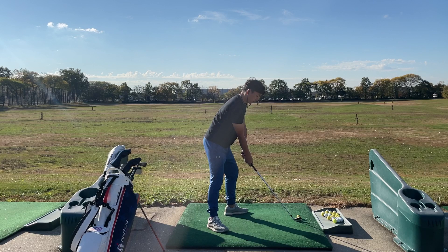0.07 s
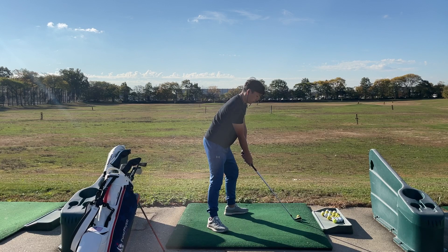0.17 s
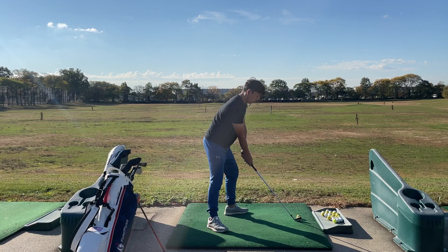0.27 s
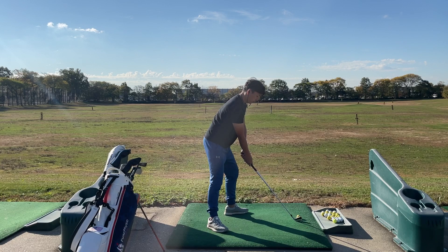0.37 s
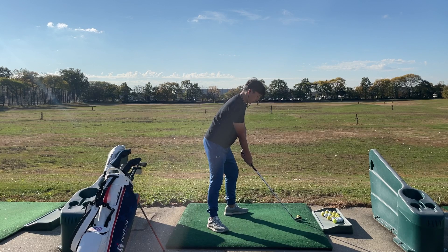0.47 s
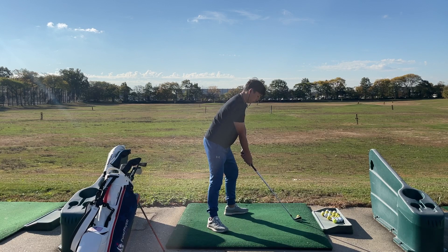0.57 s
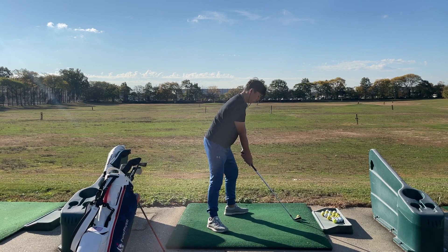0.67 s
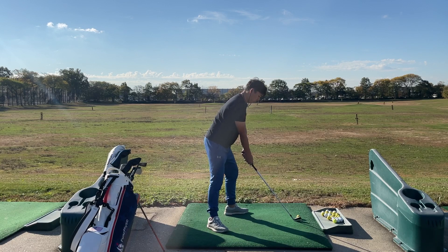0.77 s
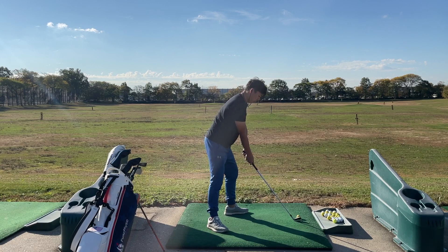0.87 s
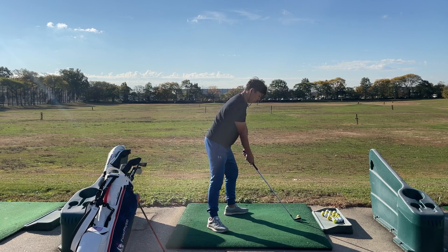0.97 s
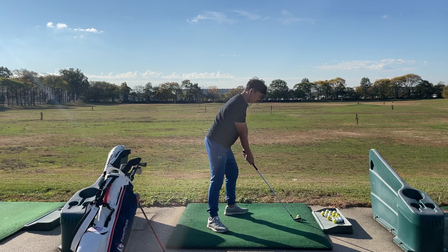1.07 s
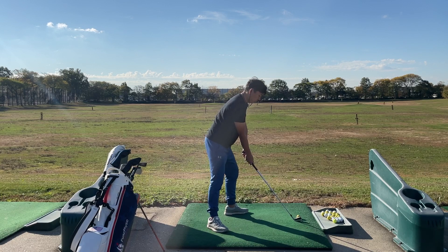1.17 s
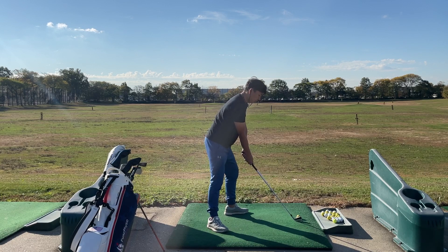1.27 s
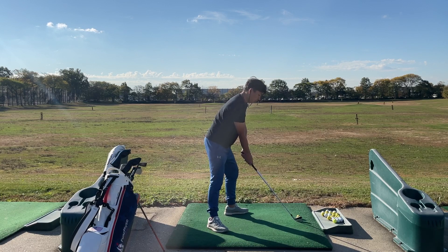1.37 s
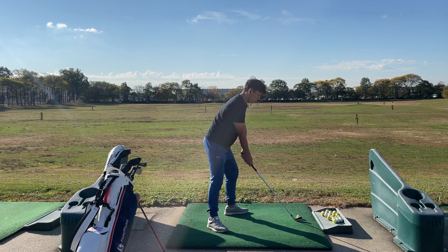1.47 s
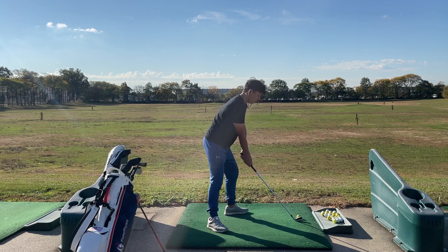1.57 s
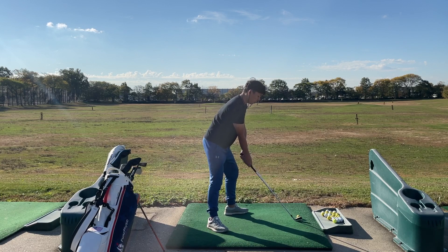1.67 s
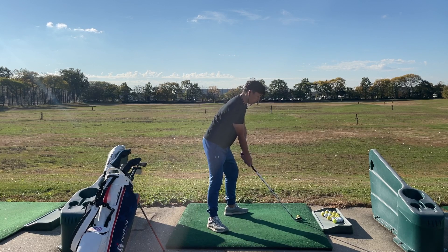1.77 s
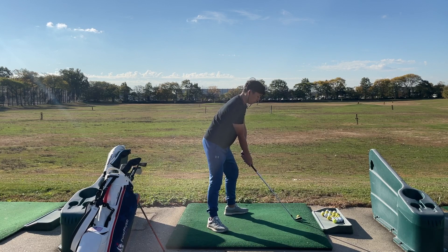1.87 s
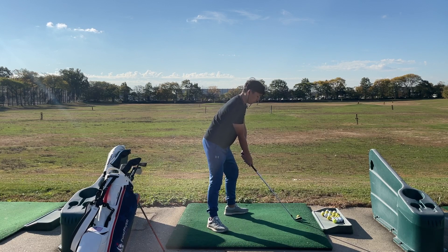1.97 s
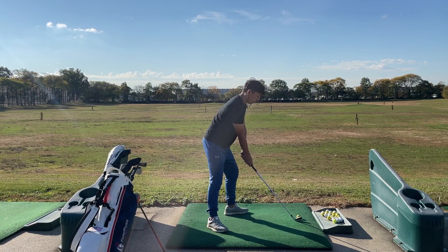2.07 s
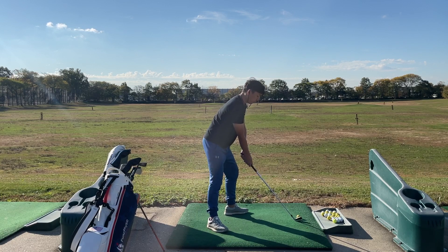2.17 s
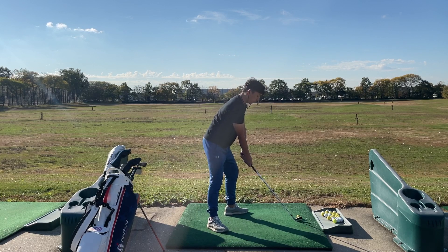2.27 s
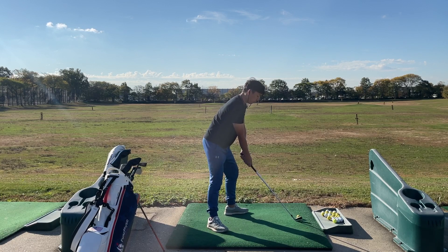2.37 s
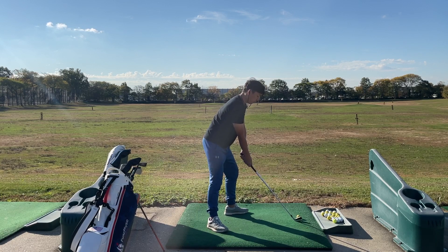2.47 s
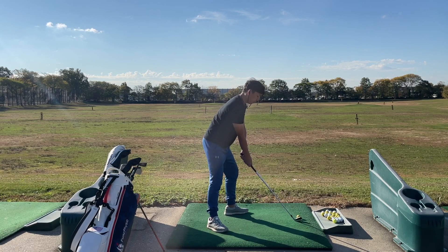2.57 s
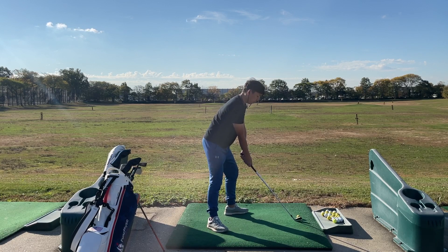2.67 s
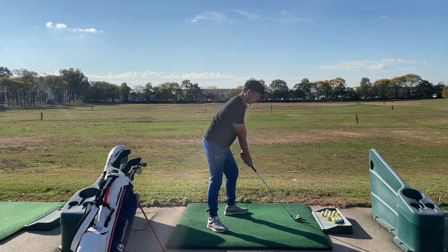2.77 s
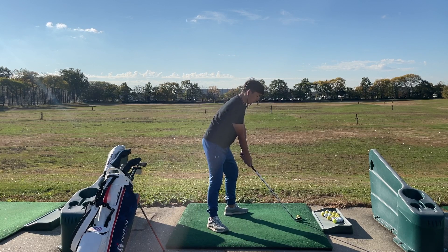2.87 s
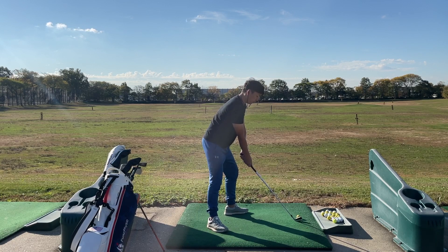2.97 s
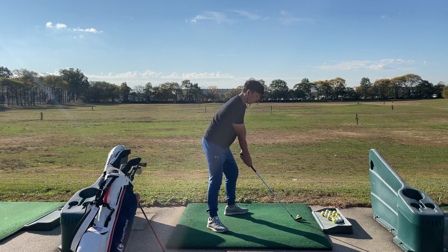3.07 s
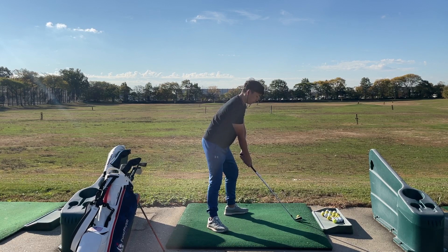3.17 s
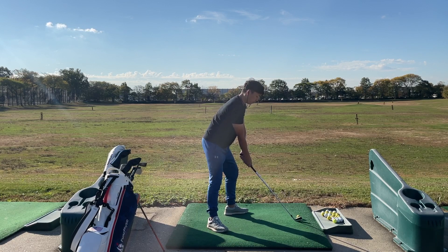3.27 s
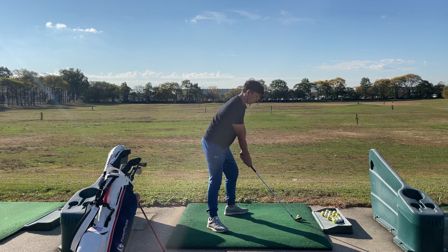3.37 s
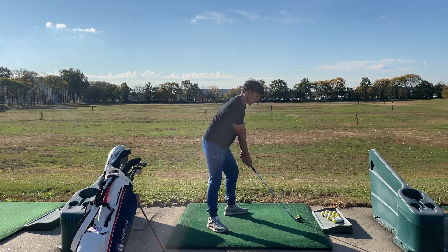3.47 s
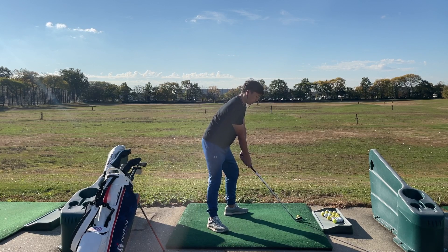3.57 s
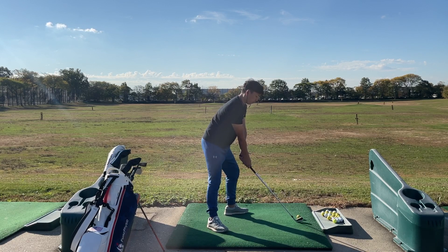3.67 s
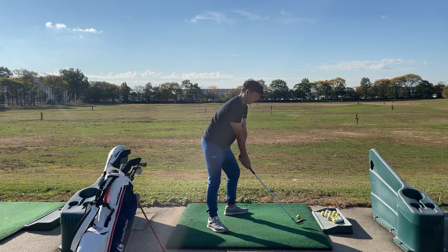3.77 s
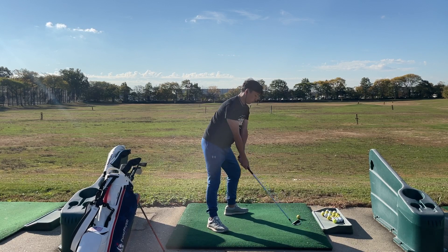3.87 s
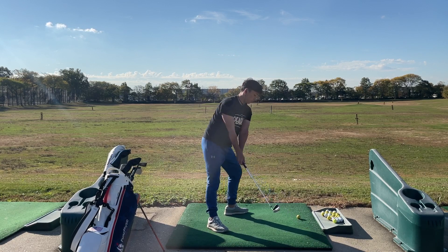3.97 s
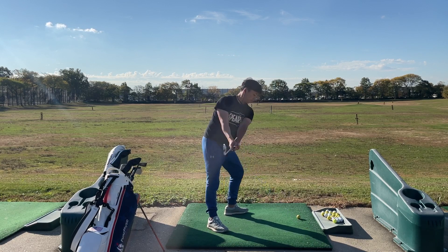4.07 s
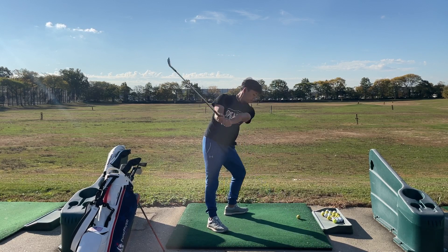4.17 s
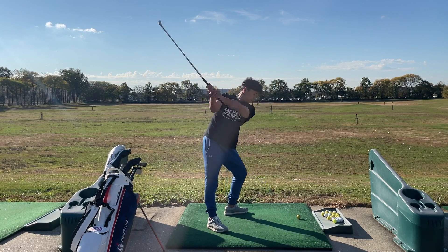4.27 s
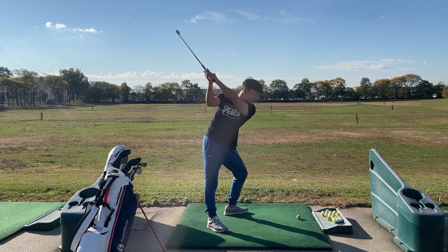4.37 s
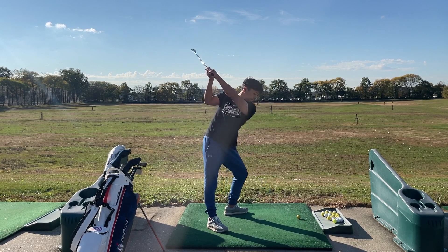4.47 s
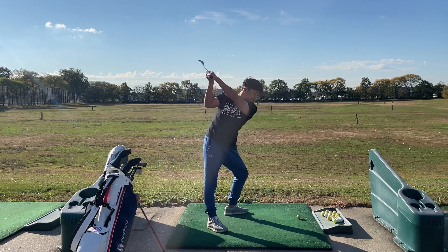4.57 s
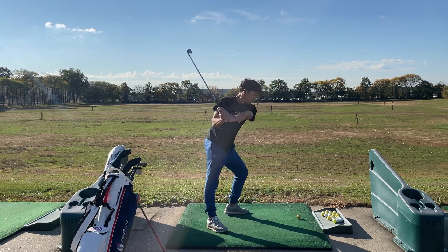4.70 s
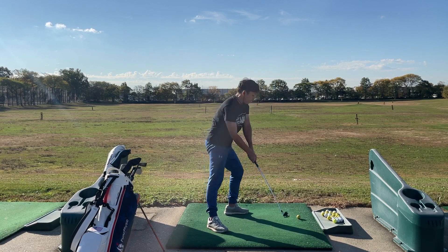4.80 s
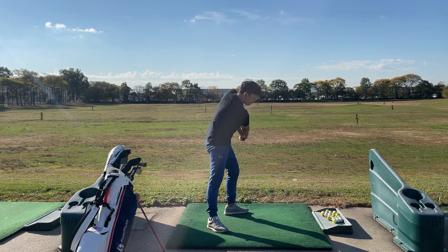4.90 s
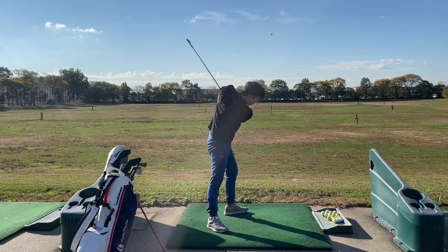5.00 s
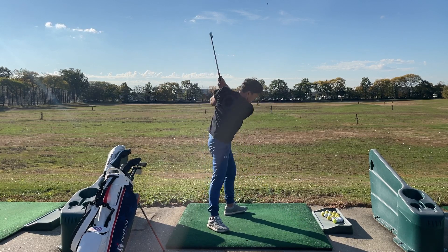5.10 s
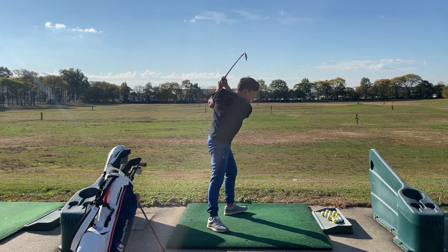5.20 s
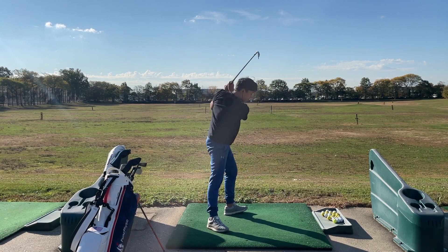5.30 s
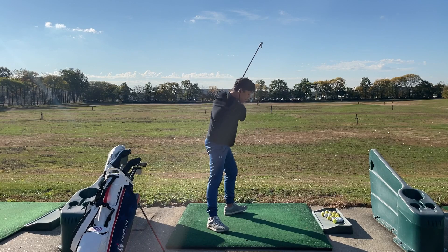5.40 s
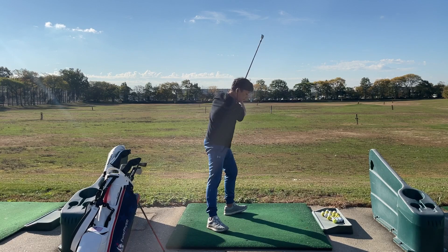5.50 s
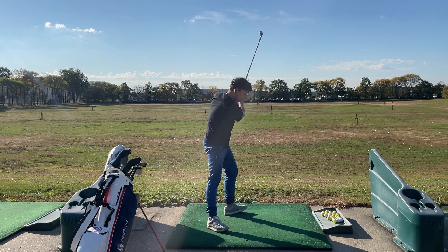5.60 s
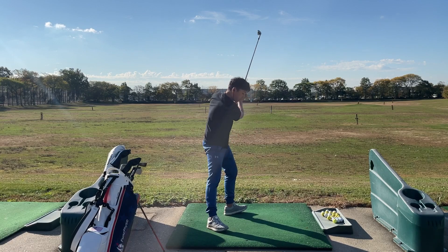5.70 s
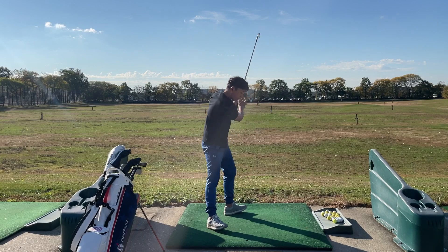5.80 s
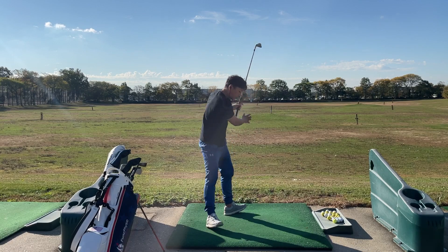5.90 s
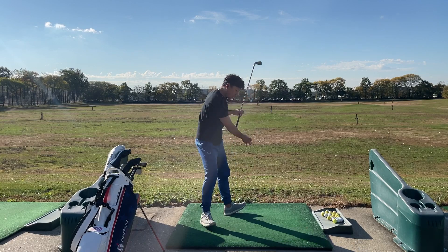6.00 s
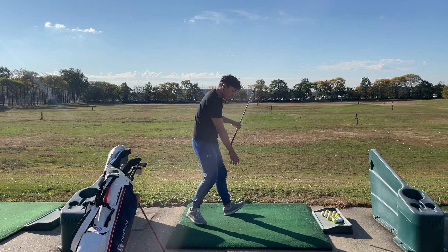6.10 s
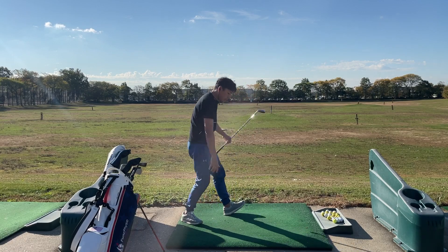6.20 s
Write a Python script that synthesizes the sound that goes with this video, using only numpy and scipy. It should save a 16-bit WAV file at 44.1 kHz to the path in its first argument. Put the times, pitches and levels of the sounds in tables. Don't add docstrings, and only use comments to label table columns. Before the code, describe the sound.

Low distant road rumble and faint bird whistles, then a quick swoosh and one sharp, bright golf strike with a short mat thump.

```python
import sys
import numpy as np
from scipy import signal
from scipy.fft import rfft, irfft, next_fast_len
from scipy.io import wavfile
from scipy.ndimage import map_coordinates

SR = 44100
rng = np.random.default_rng(int(sys.argv[2]) if len(sys.argv) > 2 else 0)


def gain_from_decibels(decibels):
    exponent = np.asarray(decibels, float) / 20
    return 10 ** exponent


def unload_audio(sound):
    columns = np.transpose(np.atleast_2d(sound))
    steps = np.round(np.clip(columns, -1, 1) * 32767)
    wavfile.write(sys.argv[1], SR, steps.astype(np.int16))


N = 275404
T = np.arange(N) / SR


def unit(x):
    return x / np.sqrt(np.mean(x ** 2) + 1e-20)


def along(points, hz):
    f, v = np.transpose(points)
    return np.interp(np.log(hz + 1), np.log(f + 1), v)


def curves(rows):
    s, *cols = np.transpose(rows)
    return [np.interp(T, s, c) for c in cols]


def wobble(rate, count=N):
    coarse = T[:count + 16:16]
    knots = rng.standard_normal(int(count * rate / SR) + 4)
    return np.interp(T[:count], coarse, map_coordinates(knots, [coarse * rate + 1]))


def filtered(x, response):
    edge = 4096
    m = next_fast_len(N + 2 * edge)
    margins = [(0, 0)] * (x.ndim - 1) + [(edge, m - N - edge)]
    long = np.pad(x, margins, "reflect", reflect_type="odd")
    return irfft(rfft(long) * response(np.fft.rfftfreq(m, 1 / SR)), m)[..., edge:N + edge]


def lead(points):
    return lambda hz: np.exp(.5j * along(points, hz) * [[-1], [1]])


def rush(spectrum, alike):
    def mix(hz):
        turn = np.arccos(np.clip(along(alike, hz), -1, 1)) / 2
        return gain_from_decibels(along(spectrum, hz)) * [np.cos(turn), np.sin(turn)]

    white = np.pad(rng.standard_normal((2, N - 2)), [(0, 0), (1, 1)])
    mid, side = filtered(white, mix)
    return unit(np.array([mid + side, mid - side]))


def tone(hz):
    return np.sqrt(2) * np.sin(2 * np.pi * np.cumsum(hz) / SR)


def burst(gain, spectrum, alike, flutter_db):
    return gain * gain_from_decibels(flutter_db * wobble(120)) * rush(spectrum, [(500, alike)])


def note(start, end, hz, db, rough_db, waver_hz):
    out, n = np.zeros(N), round((end - start) * SR)
    swell = np.sin(np.pi * np.arange(n) / n) ** .5
    level = gain_from_decibels(db + rough_db * wobble(195, count=n))
    out[round(start * SR):][:n] = level * swell * tone(hz + waver_hz * wobble(290, count=n))
    return out


def thumps(rows):
    out = np.zeros(N)
    for s, hz, db, t60 in rows:
        t = np.maximum(T - s, 0)
        out += gain_from_decibels(db - 60 * t / t60) * (1 - np.exp(-t / 0.0028)) * np.sin(2 * np.pi * hz * t)
    return out * gain_from_decibels([[.6], [-1.2]])


def swells(rows):
    levels = []
    for s, db, rise_s, hold_s, fall_s in rows:
        away = np.maximum((s - T) / rise_s, (T - s - hold_s) / fall_s)
        levels.append(db - 60 * np.maximum(away, 0))
    return gain_from_decibels(np.max(levels, axis=0))


def passes(rows):
    return np.sqrt(sum(gain_from_decibels(db) ** 2 / (1 + ((T - s) / half_s) ** 2) for s, db, half_s in rows))


# pitch_hz, likeness (0 to 1)
LIKENESS = [(60, 0.95), (300, 0.9), (600, 0.26), (1500, 0.26), (2800, 0.51), (3600, 0.17), (4700, 0.45),
            (5800, 0.11), (7000, 0.69), (8200, 0.95), (10000, .75), (11500, 0.57), (13000, .65),
            (15000, .99)]
# time_s, level_db
ROAD_FLOW = [(0, -38.5), (.8, -38), (1.1, -44), (2.0, -40.5), (2.8, -40), (3.4, -45), (4.1, -35),
             (4.6, -39.5), (5.0, -36), (5.42, -36), (5.75, -40.5), (6.24, -41)]
# time_s, level_db
AXLES = [(.07, -33.5), (.2, -42), (.31, -33), (.42, -40), (.71, -33), (.85, -37), (1.16, -35.5),
         (1.49, -40), (1.75, -41), (1.91, -35.5), (3.05, -33), (3.18, -37), (3.319, -34.5), (3.51, -31),
         (3.6, -32), (3.68, -34.5), (3.77, -36), (3.89, -35), (4.19, -29), (4.33, -33), (4.48, -37),
         (4.68, -26.5), (5.23, -37), (5.35, -36), (5.5, -36.5), (5.63, -34), (6.01, -35)]
# pitch_hz, level_db (per Hz)
RUMBLE_COLOUR = [(12, -60), (25, -24), (45, -4), (62, 0), (100, -7.5), (135, -11.5), (165, -18.5),
                 (230, -30), (400, -120)]


def road_rumble():
    seams = swells([(s, db, 0.3, 0, 0.24) for s, db in AXLES])
    flow = np.hypot(gain_from_decibels(curves(ROAD_FLOW)[0]), seams)
    return flow * gain_from_decibels(2.5 + 0.56 * wobble(5.4)) * rush(RUMBLE_COLOUR, LIKENESS)


# nearest_s, level_db, half_power_s
LORRY_PASSES = [(.65, -54.5, .4), (1.55, -54, .2), (2.2, -53.5, .25), (3.68, -50.5, 0.15),
                (4.45, -42, 0.12), (5.12, -49.5, 0.14), (6.2, -49.5, .15)]
# pitch_hz, level_db (per Hz)
LORRY_COLOUR = [(90, -120), (150, 0), (210, 3.5), (320, 1), (400, -6.5), (600, -22.5), (1000, -20),
                (1500, -120)]
# peak_s (rise ends), level_db, rise_s, hold_s, fall_s
PANEL_RATTLE = [(5.0, -49.5, 0.56, 0.05, 0.32)]
# pitch_hz, level_db (per Hz)
PANEL_COLOUR = [(300, -120), (420, -3.5), (600, 2), (900, -3.5), (1200, -29), (1600, -120)]
# peak_s (rise ends), level_db, rise_s, hold_s, fall_s
CAB_BOOM = [(4.3, -39, 0.68, 0.2, .5), (4.98, -49, 0.6, 0.1, .5), (.6, -52.5, .6, .2, 0.65)]
# pitch_hz, level_db (per Hz)
CAB_COLOUR = [(120, -120), (180, -39.5), (250, -5.5), (290, -1), (330, 0.5), (370, -10), (470, -39.5),
              (700, -120)]
# peak_s (rise ends), level_db, rise_s, hold_s, fall_s
TRAILER_BOOM = [(4.42, -41.5, .4, 0.16, 0.72), (5.03, -46.5, .4, .2, 0.45), (6.14, -49, .4, .1, .4)]
# pitch_hz, level_db (per Hz)
TRAILER_COLOUR = [(100, -120), (150, -39.5), (200, 0), (235, 2), (265, -4.5), (350, -41), (500, -120)]


def lorries():
    near = passes(LORRY_PASSES)
    far_db, panel_db = -52.5, -8.5
    drone = np.hypot(gain_from_decibels(far_db), near) * gain_from_decibels(1.5 + 0.37 * wobble(5.9)) * rush(LORRY_COLOUR, LIKENESS)
    panel_gain = gain_from_decibels(panel_db) * near + swells(PANEL_RATTLE)
    panels = burst(panel_gain, PANEL_COLOUR, alike=.7, flutter_db=1.8)
    cab = burst(swells(CAB_BOOM), CAB_COLOUR, alike=1.0, flutter_db=2.0)
    trailer = burst(swells(TRAILER_BOOM), TRAILER_COLOUR, alike=1.0, flutter_db=-0.5)
    return drone + panels + cab + trailer


# nearest_s, level_db, half_power_s
CAR_PASSES = [(1.7, -59, 0.45), (4.72, -55, 0.13), (5.82, -52.5, 0.12), (6.24, -56.5, 0.23)]
# pitch_hz, level_db (per Hz)
TYRE_COLOUR = [(200, -120), (380, 1), (600, 2), (1000, -1), (1500, -8.5), (2600, -16.5), (3600, -23.5),
               (6000, -32), (9000, -120)]


def tyres():
    steady = gain_from_decibels(-53 + 0.2261 * T)
    gain = np.hypot(steady, passes(CAR_PASSES))
    return gain * gain_from_decibels(2.5 + 0.37 * wobble(5)) * rush(TYRE_COLOUR, LIKENESS)


# time_s, high_pitch_hz, high_level_db, low_pitch_hz, low_level_db
ENGINE_TONES = [(0, 324.1, -54, 136, -48.5), (1, 325.3, -53, 135.1, -54), (2.4, 321, -61, 134.1, -51.5),
                (3, 325, -72, 134.9, -54.5), (3.8, 318, -54, 136.6, -56.5), (4.6, 317, -69.5, 134.3, -57.5),
                (6.24, 312.8, -56.5, 136, -57)]
# time_s, pitch_hz, level_db
GEAR_CHANGE = [(5.76, 167.8, -81), (5.82, 141.6, -39.5), (5.9, 85.1, -38.5), (6.0, 60.6, -31),
               (6.12, 51.3, -34.5), (6.2, 44, -74)]


def engines():
    high_hz, high_db, low_hz, low_db = curves(ENGINE_TONES)
    high = gain_from_decibels(high_db + 0.98 * wobble(12)) * tone(high_hz + 4 * wobble(15))
    low = gain_from_decibels(low_db + 5.2 * wobble(9)) * tone(low_hz + 2.17 * wobble(11))
    drop_hz, drop_db = curves(GEAR_CHANGE)
    return high + low + gain_from_decibels(drop_db) * tone(drop_hz) * (T > GEAR_CHANGE[0][0])


# pitch_hz, right_leads_radians (extra)
ROAD_DIRECTION = [(200, 0), (450, .5), (900, 1.7), (1500, 2), (2000, -.2), (3000, 0)]


def traffic():
    return filtered(road_rumble() + lorries() + tyres() + engines(), lead(ROAD_DIRECTION))


# time_s, level_db
INSECT_LEVEL = [(0, -73.5), (.7, -74), (1.8, -68.5), (2.4, -68), (3.0, -68.5), (3.7, -67.5), (4.2, -69.5),
                (4.6, -72.5), (5.0, -71), (5.45, -73.5), (6.24, -75)]
# pitch_hz, level_db (per Hz)
INSECT_COLOUR = [(3000, -120), (4000, -5), (5200, -2), (6800, -5.5), (8000, -10), (9500, -120)]


def insects():
    return gain_from_decibels(curves(INSECT_LEVEL)[0] + .8 * wobble(14)) * rush(INSECT_COLOUR, LIKENESS)


# time_s, level_db
BREEZE_LEVEL = [(0, -73.5), (.7, -75), (1.5, -75.5), (2.3, -74), (2.9, -75), (3.6, -76.5), (4.1, -77),
                (4.4, -80.5), (4.7, -78), (5.5, -79), (6.24, -79.5)]
# peak_s (rise ends), level_db, rise_s, hold_s, fall_s
GUSTS = [
    (4.88, -64, .4, 0.0067, 0.85),
    (6.24, -79, 3, 0.0021, 1),
]
# pitch_hz, level_db (per Hz)
LEAF_COLOUR = [(2000, -120), (3500, -1), (6000, -4.5), (8200, -2.5), (11000, -6.5), (13500, -12.5),
               (15600, -10.5), (16000, -120)]


def leaves():
    breeze = np.hypot(gain_from_decibels(curves(BREEZE_LEVEL)[0]), swells(GUSTS))
    return breeze * gain_from_decibels(.7 * wobble(7.2)) * rush(LEAF_COLOUR, LIKENESS)


# start_s, level_db, pitch_hz (centre), decay_s (over 60 dB)
CLOTH_TICKS = [(.59, -62, 11000, .015), (1.2446, -46, 7000, 0.0078), (1.2472, -50, 12500, 0.0061),
               (1.2525, -58, 11000, .008), (1.367, -49.5, 8800, .012), (1.4442, -65, 12000, 0.0061),
               (1.81, -56, 3500, .01), (2.052, -50, 4226, .01), (2.7383, -49, 6500, 0.0051),
               (2.9675, -55, 5500, .005), (4.518, -54, 7000, 0.0054), (4.5206, -50, 5500, 0.011),
               (4.638, -58, 3500, .07), (4.64, -68, 11000, .05), (4.6545, -55.5, 11500, 0.012),
               (4.668, -54, 12500, .012), (4.9135, -64, 11000, 0.007), (5.35, -51, 5000, 0.0086),
               (6.1352, -54, 3590, 0.06), (6.1868, -62, 12500, .012)]


def ticks():
    out, t = np.zeros(N + SR), np.arange(2048) / SR
    band = np.log(np.fft.rfftfreq(len(t), 1 / SR) + 1)
    for s, db, hz, t60 in CLOTH_TICKS:
        colour = np.exp(-((band - np.log(hz)) / .5) ** 2)
        grit = unit(irfft(rfft(rng.standard_normal(len(t))) * colour))
        out[round(s * SR):][:len(t)] += gain_from_decibels(db - 60 * t / t60) * (1 - np.exp(-t / .0008)) * grit
    return out[:N]


# start_s, break_s, pitch_hz, level_db
HIGH_NOTES = [
    (0.931, 0.992, 3027, -58.5),
    (2.203, 2.28, 2924, -58.5),
    (6.043, 6.107, 2847, -64.5),
]
# end_s, pitch_hz, level_db, overtone_db, echo_s
LOW_NOTES = [
    (1.04, 2300, -60, -7, .03),
    (2.299, 2450, -54, -6, .018),
    (6.124, 2480, -55, -24, 0.062),
]
# start_s, end_s, pitch_hz, level_db
LATE_ECHOES = [
    (1.02, 1.032, 2250, -63),
    (1.036, 1.056, 2230, -65),
]


def bird():
    song = np.zeros(N)
    break_s, fade_s = 0.0095, 0.0065
    pure_db, reedy_db, break_db = -27, -12, -30
    for (start, snap, hz, db), (end, low_hz, low_db, over_db, echo_s) in zip(HIGH_NOTES, LOW_NOTES):
        low = snap + break_s
        sag = lambda s: low_hz - 4900 * (s - low)
        pitch_hz, level_db, reed_db = curves([
            (start, .88 * hz, db - 6, pure_db),
            (start + 0.189 * (snap - start), .985 * hz, db - 2.5, pure_db),
            (snap - .025, 1.01 * hz, db, pure_db + 5),
            (snap, .98 * hz, db, reedy_db),
            (snap + break_s / 2, (hz + low_hz) / 2, low_db - 3.0, break_db),
            (low, low_hz, low_db, over_db - 12),
            (low + fade_s, sag(low + fade_s), low_db, over_db),
            (end - fade_s, sag(end - fade_s), low_db - 2, over_db),
            (end, sag(end), low_db - 25, over_db)])
        overtones = tone(2 * pitch_hz) + 0.65 * tone(3 * pitch_hz) * (T > low)
        thinning = gain_from_decibels(-350 * np.maximum(T - low, 0))
        voice = thinning * tone(pitch_hz) + gain_from_decibels(reed_db) * overtones
        song += gain_from_decibels(level_db + 2.1 * wobble(140)) * voice * (T > start) * (T < end)
        song += note(snap, snap + echo_s, .99 * hz, -63, rough_db=-2.0, waver_hz=13.4)
    song += sum(note(*row, rough_db=2.5, waver_hz=40) for row in LATE_ECHOES)
    song = filtered(song, lambda hz: 1 / (1 + (hz / 7600) ** 12))
    t = np.arange(SR // 8) / SR
    trees = rng.standard_normal((2, len(t))) * gain_from_decibels(-60 * t / .12) * (t > .004)
    wet = signal.fftconvolve(song[None], trees / np.linalg.norm(trees[0]), axes=1)[:, :N]
    return song * gain_from_decibels([[1.2], [-1.2]]) + gain_from_decibels(-11) * wet


# start_s, pitch_hz, level_db, decay_s (over 60 dB)
FAR_THUDS = [(4.635, 360, -24.5, 0.058), (4.632, 250, -27, .07), (4.4815, 600, -30.5, 0.055),
             (4.67, 150, -23, 0.093), (5.025, 125, -26, .1), (5.8, 150, -26, 0.076)]


def far_mats():
    return thumps(FAR_THUDS)


# start_s, end_s, pitch_hz, level_db
GRIP_SQUEALS = [(5.63, 5.645, 5010, -72), (5.665, 5.70, 5010, -71), (5.697, 5.715, 5000, -64),
                (5.658, 5.72, 11800, -73.5), (5.665, 5.70, 10500, -80), (5.70, 5.73, 11450, -83),
                (5.66, 5.72, 7150, -74), (5.75, 5.81, 3680, -64), (5.77, 5.79, 3270, -60),
                (5.77, 5.79, 4300, -68), (5.9, 5.93, 2250, -67), (6.17, 6.24, 2830, -70),
                (5.79, 5.855, 3310, -65), (5.81, 5.825, 6780, -70), (5.72, 5.84, 6790, -75),
                (5.70, 5.79, 4570, -70), (5.75, 5.80, 4150, -69), (5.8, 5.87, 920, -52),
                (4.636, 4.657, 2750, -65), (4.634, 4.66, 4250, -69)]
# time_s, pitch_hz, level_db
SLIDING_SQUEAL = [(5.69, 5050, -90), (5.71, 4850, -73), (5.745, 4450, -71), (5.775, 3800, -69),
                  (5.81, 3400, -69), (5.85, 3250, -90)]
# peak_s (rise ends), level_db, rise_s, hold_s, fall_s
GLOVE_SLIDE = [
    (5.66, -76, .15, .07, .3),
    (5.76, -57.5, .15, 0.056, .25),
    (6.03, -79, .3, 0.0065, .3),
]
# pitch_hz, level_db (per Hz)
AIR_COLOUR = [(250, -61.5), (500, 8), (1000, -4), (2500, -4), (4200, -9), (7000, -20.5), (10500, -23),
              (14000, -28), (15600, -40), (16000, -120)]
# peak_s (rise ends), level_db, rise_s, hold_s, fall_s
LEATHER_TWIST = [
    (5.665, -75, 0.089, .055, .2),
    (5.79, -75, 0.35, .03, .2),
]
# pitch_hz, level_db (per Hz)
LEATHER_COLOUR = [(3000, -120), (5000, -2), (8000, 0), (12000, -2), (14000, -6), (15500, -15),
                  (16000, -120)]


def grip():
    squeals = sum(note(*row, rough_db=3.5, waver_hz=65) for row in GRIP_SQUEALS)
    creak_hz, creak_db = curves(SLIDING_SQUEAL)
    sounding = (T > SLIDING_SQUEAL[0][0]) * (T < SLIDING_SQUEAL[-1][0])
    squeals += gain_from_decibels(creak_db + 5 * wobble(150)) * tone(creak_hz + 180 * wobble(250)) * sounding
    slide = burst(swells(GLOVE_SLIDE), AIR_COLOUR, alike=.9, flutter_db=2.5)
    twist = burst(swells(LEATHER_TWIST), LEATHER_COLOUR, alike=.95, flutter_db=1.0)
    return slide + twist + squeals


# time_s, level_db
SWISH = [(4.68, -100), (4.72, -72), (4.75, -63), (4.778, -45.5), (4.80, -41.5), (4.821, -38),
         (4.828, -43.5), (4.837, -68), (4.845, -100)]
# peak_s (rise ends), level_db, rise_s, hold_s, fall_s
TURF_SPRAY = [(4.841, -27, .007, 0.0011, .055), (4.85, -39, .03, 0.0041, 0.084), (4.865, -48.5, .05, 0, .2),
              (4.96, -59, .4, 0.072, .3)]
# pitch_hz, level_db (per Hz)
FIBRE_COLOUR = [(250, -61), (600, 1.5), (2400, 3.5), (3300, -2.5), (4500, -2), (8000, -19), (11500, -19),
                (14000, -34), (15000, -50.5), (15500, -120)]


def swing():
    air = burst(gain_from_decibels(curves(SWISH)[0]), AIR_COLOUR, alike=0.93, flutter_db=.9)
    return air + burst(swells(TURF_SPRAY), FIBRE_COLOUR, alike=0.81, flutter_db=1.4)


# peak_s, level_db, rise_s, ring_share (of the full ring time)
CONTACTS = [
    (4.8374, -21, .0005, .5),
    (4.83885, -5.5, .00055, .55),
    (4.84052, -5.7, .00045, .55),
    (4.84135, -10, .00035, .85),
    (4.8426, -17.5, .0003, .5),
]
# pitch_hz, level_db, decay_s (over 60 dB), left_minus_right_db
HEAD_TONES = [(676.5, -12, 0.018, 0), (965, -17.5, 0.02, 0), (1800, -15.5, 0.0091, -4),
              (2375, -4.8, 0.0085, -1), (2850, -18.5, 0.0067, 1), (3240, -22, .004, 1),
              (4350, -14.5, 0.012, 2), (6380, -20, 0.0031, 0)]
# start_s, level_db, decay_s (over 60 dB)
COVER_CRACKS = [
    (4.838, -9, .004),
    (4.8397, -21, .005),
    (4.8409, -26, .008),
    (4.8422, -32, .032),
]
# pitch_hz, level_db (per Hz)
SNAP_COLOUR = [(1000, -66), (3000, -6.5), (5000, -5), (6800, -9), (8000, -4), (9500, -10), (12000, -7.5),
               (14500, -3), (15600, -5), (16200, -16), (16800, -120)]
# pitch_hz, right_leads_radians (extra)
BALL_DIRECTION = [(14500, 0), (15300, .3), (17000, .5)]
# start_s, pitch_hz, level_db, decay_s (over 60 dB)
MAT_AND_SHAFT = [(4.8428, 165, -13, .04), (4.842, 62, -19, .05), (4.8397, 340, -16, .018),
                 (4.8488, 420, -26, .02), (4.8418, 3300, -22, .011), (4.842, 4320, -21, .012),
                 (4.8425, 11560, -19.5, .015), (4.8422, 12300, -26, .014), (4.8395, 10700, -18, .008)]


def strike():
    head, crack = np.zeros((2, N)), np.zeros(N)
    near = slice(round(4.8 * SR), round(4.9 * SR))
    for s, db, rise_s, share in CONTACTS:
        t = T[near] - s
        rise = np.exp(-(np.minimum(t, 0) / rise_s) ** 2)
        for hz, mode_db, t60, pan_db in HEAD_TONES:
            fade = gain_from_decibels(db + mode_db - 60 * np.maximum(t, 0) / (share * t60))
            ring = fade * rise * np.cos(2 * np.pi * hz * t)
            head[:, near] += gain_from_decibels([[pan_db / 2], [-pan_db / 2]]) * ring
    cover = rush(SNAP_COLOUR, [(2500, 0.6), (8000, 0.96), (15000, .95)])
    dull = filtered(cover, lambda hz: 1 / (1 + (hz / 15800) ** 30))
    for k, (s, db, t60) in enumerate(COVER_CRACKS):
        onset = np.clip((T - s) / 0.00024, 0, 1)
        crack = crack + gain_from_decibels(db - 60 * np.abs(T - s) / t60) * onset * (dull if k > 0 else cover)
    snap = filtered(crack, lead(BALL_DIRECTION)) * gain_from_decibels([[.5], [-.5]])
    return head * gain_from_decibels([[.6], [-1.2]]) + thumps(MAT_AND_SHAFT) + snap


def scene():
    return traffic() + insects() + leaves() + ticks() + bird() + far_mats() + grip() + swing() + strike()


def roll_off(x):
    return signal.sosfilt(signal.butter(12, 16930, fs=SR, output="sos"), x)


# pitch_hz, right_leads_radians
PORT_SPACING = [(100, 0), (4800, .1), (6500, .8), (8200, 3.14), (11000, 6.2), (12200, 6.4), (14700, 9.4),
                (17000, 9.5)]
# pitch_hz, left_minus_right_db
PORT_TILT = [(60, 1), (250, 1.5), (700, -1.5), (1300, -0.5), (2400, 0.3), (4400, 1.2), (8000, 0.9),
             (12000, -1.5)]


def record(dry):
    def microphone(hz):
        sides = lead(PORT_SPACING)(hz) * gain_from_decibels(along(PORT_TILT, hz) * [[.5], [-.5]])
        bass_cut = hz ** 2 / (hz ** 2 + 22 ** 2)
        return sides * bass_cut / (1 + (hz / 16400) ** 80)

    soft_ends = np.clip(np.minimum(T, T[-1] - T) / .004, 0, 1)
    return roll_off(filtered(dry, microphone) * soft_ends)


dry = scene()
out = record(dry)
unload_audio(out)
```